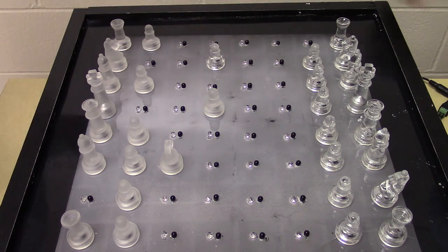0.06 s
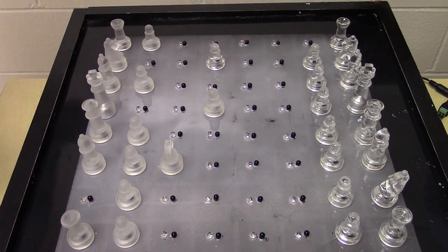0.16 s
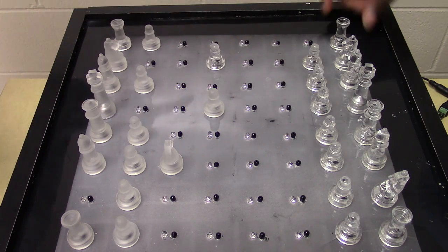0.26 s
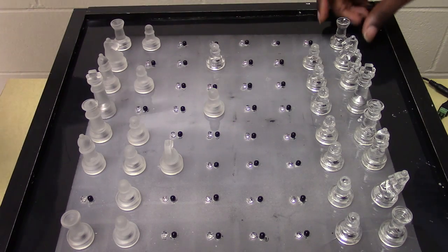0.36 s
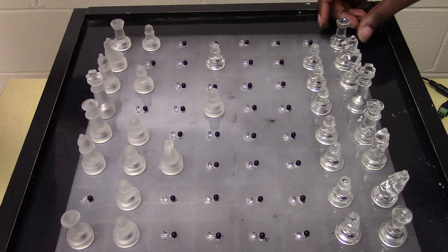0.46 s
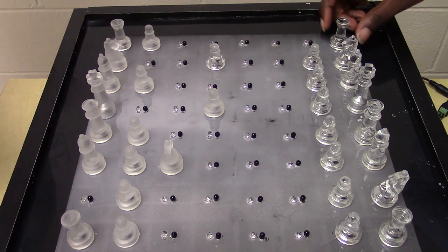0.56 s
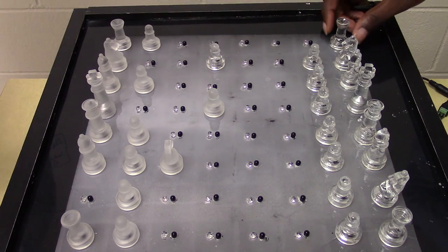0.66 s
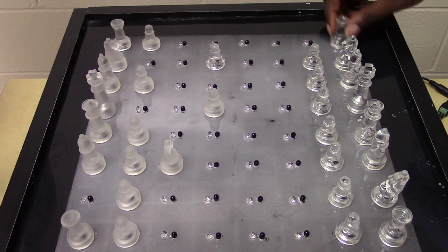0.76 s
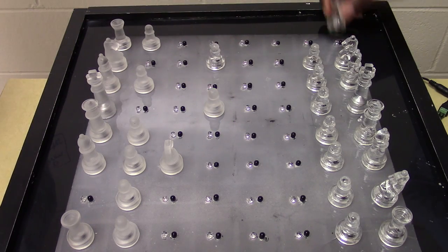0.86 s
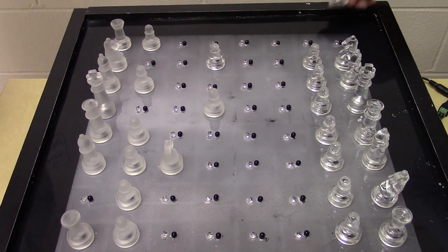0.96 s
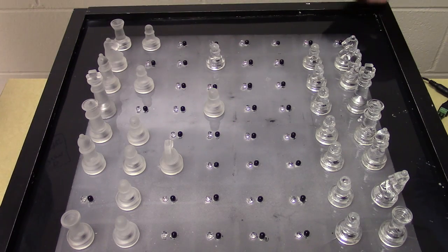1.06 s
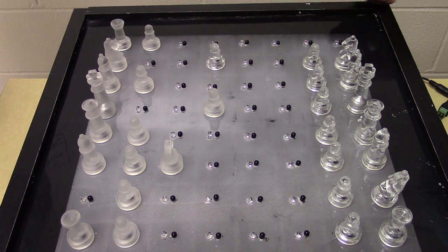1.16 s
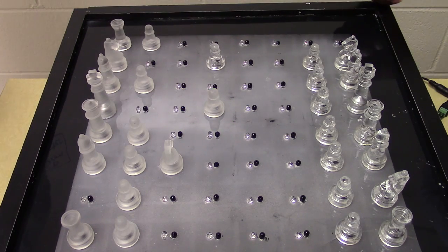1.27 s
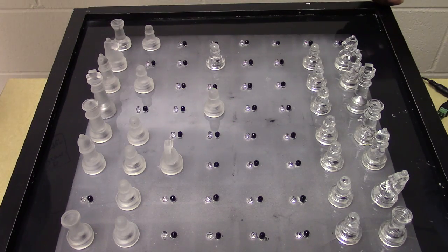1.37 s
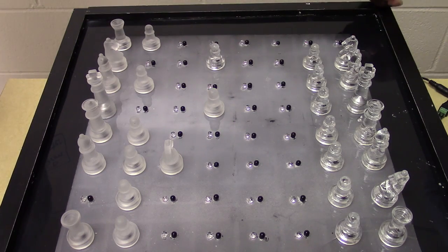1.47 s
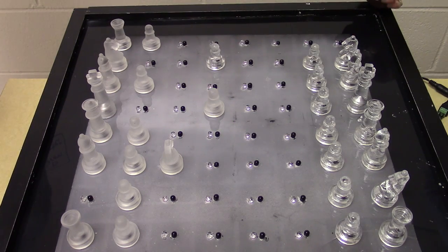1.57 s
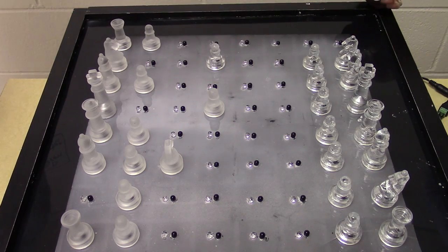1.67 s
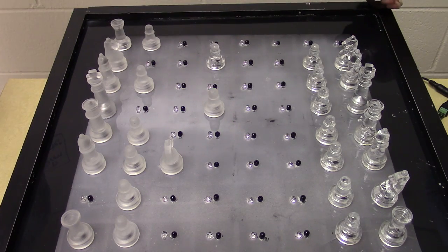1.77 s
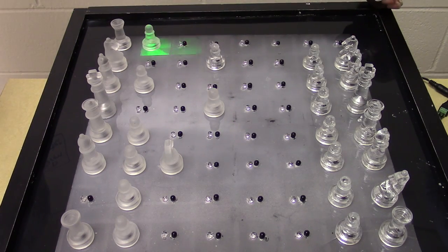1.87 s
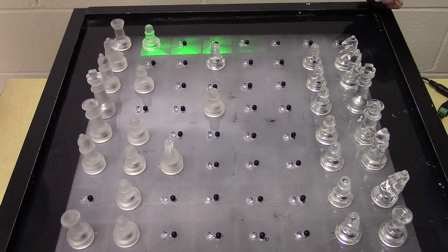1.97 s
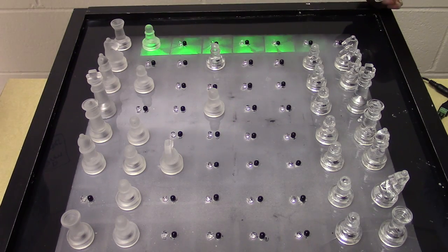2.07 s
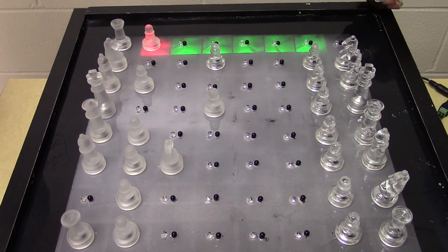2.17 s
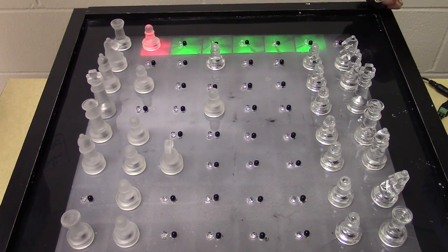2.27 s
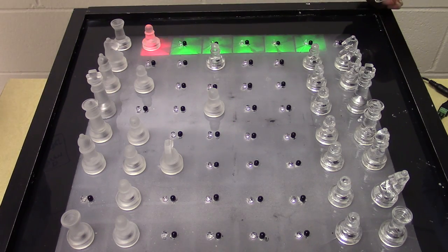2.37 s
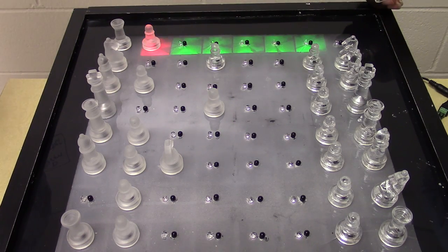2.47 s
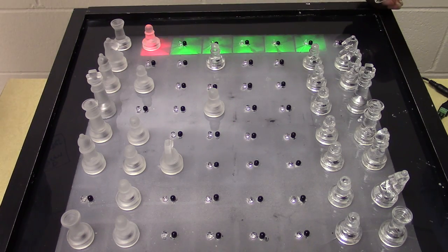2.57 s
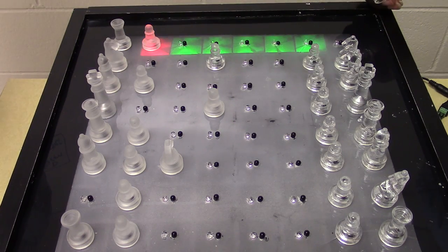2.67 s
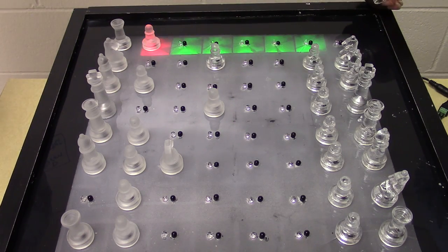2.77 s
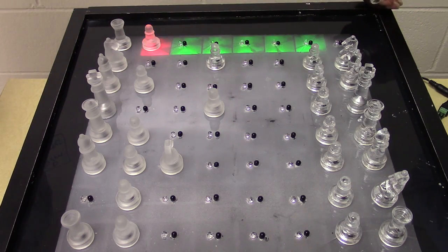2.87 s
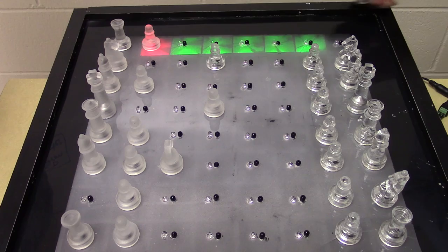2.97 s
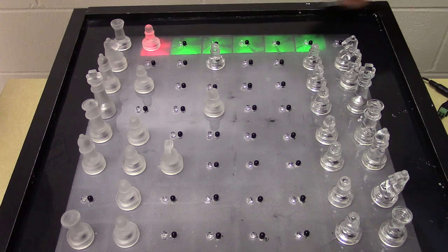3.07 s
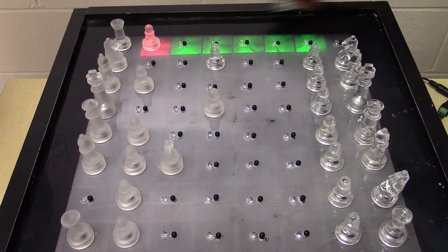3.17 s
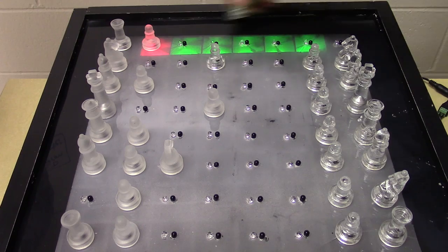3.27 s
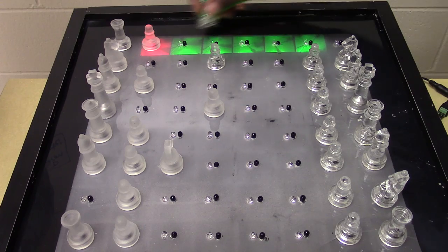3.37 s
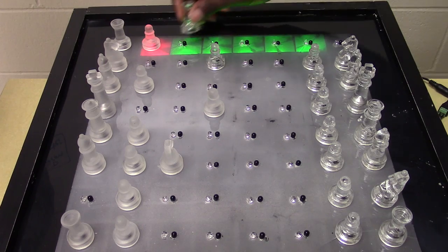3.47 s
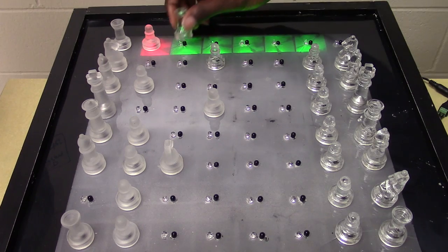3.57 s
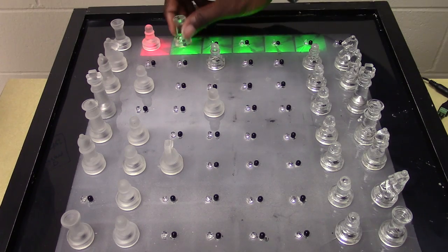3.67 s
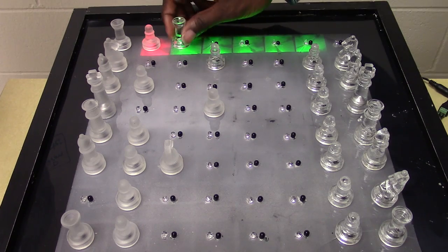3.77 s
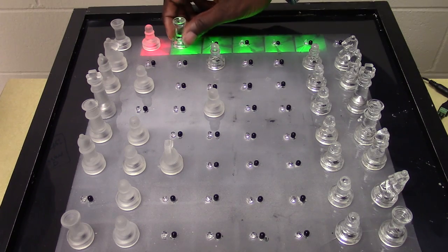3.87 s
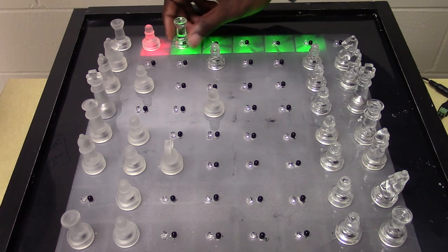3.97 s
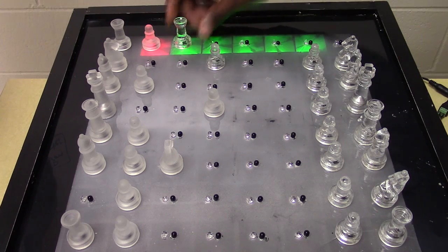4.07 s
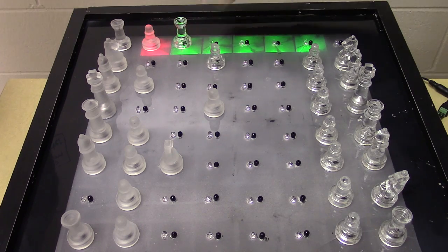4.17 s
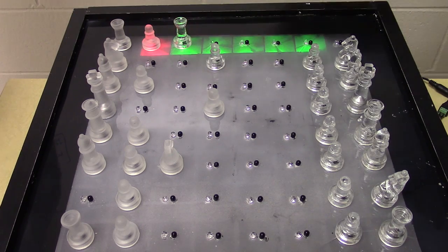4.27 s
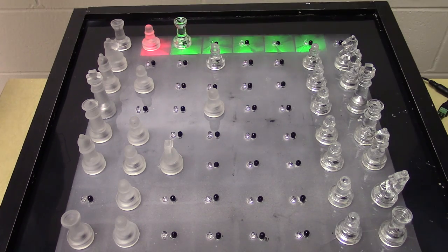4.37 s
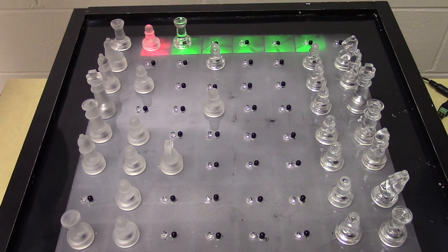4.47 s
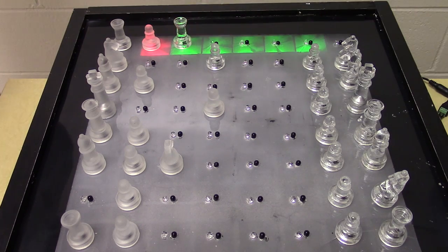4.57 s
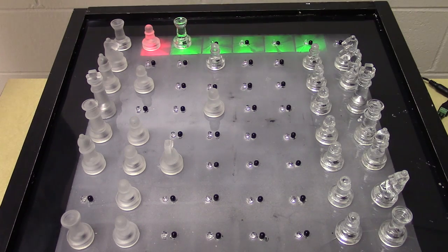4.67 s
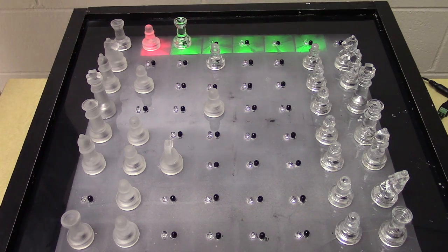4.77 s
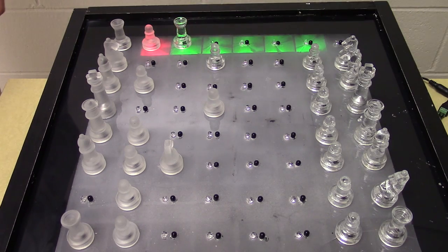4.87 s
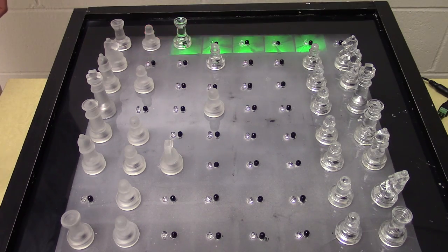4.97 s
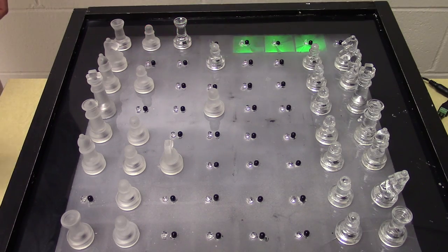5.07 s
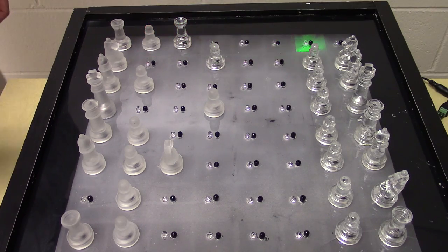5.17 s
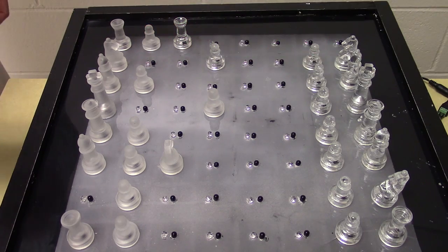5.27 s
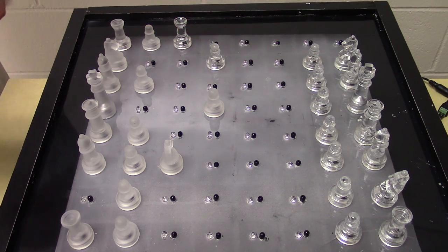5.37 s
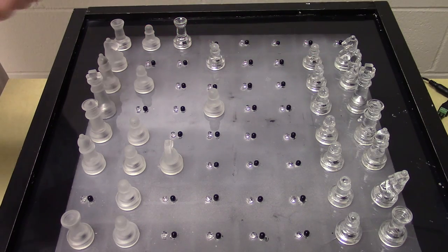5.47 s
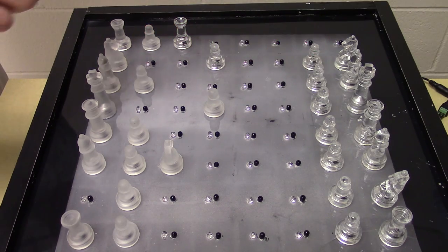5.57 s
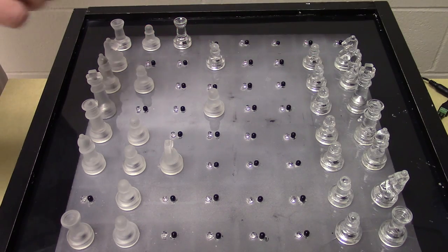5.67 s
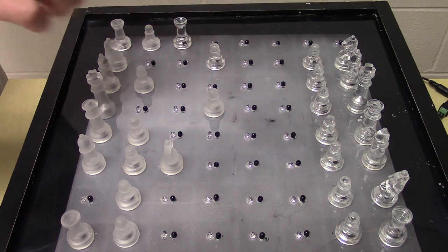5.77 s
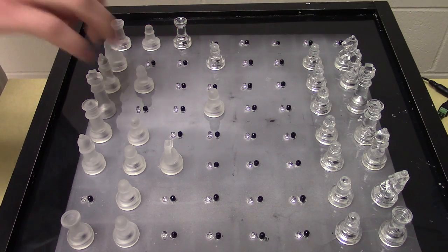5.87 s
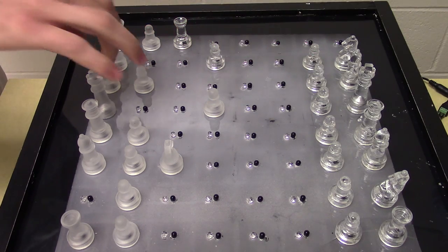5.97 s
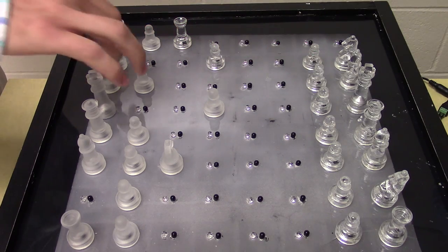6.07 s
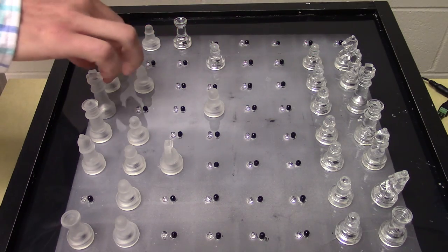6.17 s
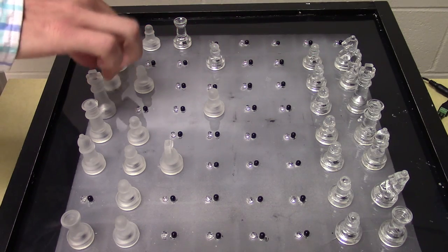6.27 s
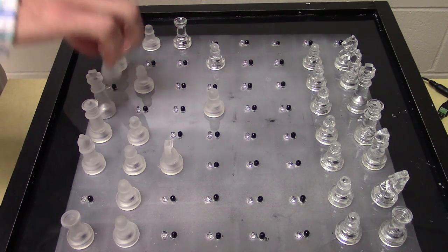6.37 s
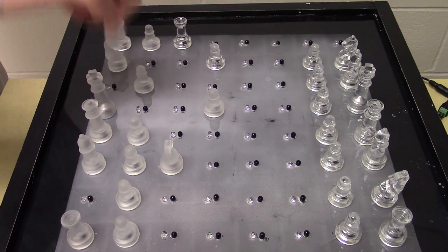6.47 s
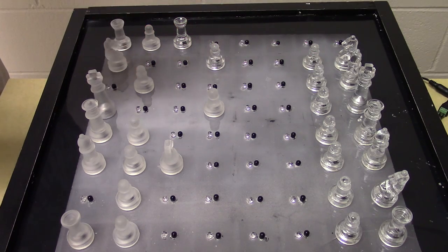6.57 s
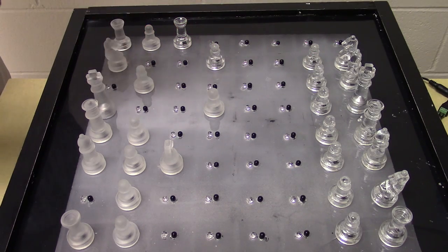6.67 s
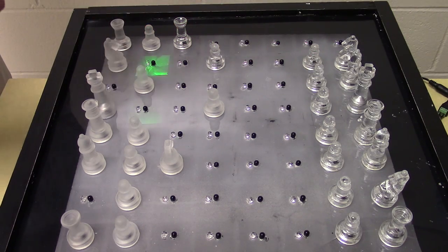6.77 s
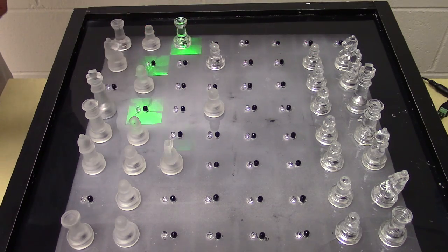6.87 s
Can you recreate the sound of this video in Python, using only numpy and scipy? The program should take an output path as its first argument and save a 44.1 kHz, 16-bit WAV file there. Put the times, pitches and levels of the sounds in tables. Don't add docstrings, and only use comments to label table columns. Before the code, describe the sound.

Quiet small hard-walled room with low ventilation rumble and faint mains hum. A glass piece knocks as it is lifted from a hollow board, sleeves rustle, then it lands with a loud, sharp, boxy clack and a small rebound. Light settling taps, cloth brushing and a brief chair creak follow, then another piece is nudged and rattles. Close camera microphone, with tiny lens motor buzzes.

```python
import sys
import numpy as np
from scipy import signal
from scipy.fft import rfft, irfft
from scipy.io import wavfile
from scipy.ndimage import uniform_filter1d

SR = 44100
rng = np.random.default_rng(int(sys.argv[2]) if len(sys.argv) > 2 else 0)


def master_out(mix):
    frames = np.transpose(np.atleast_2d(mix))
    ceiling = np.clip(frames, -1, 1)
    pcm = np.round(ceiling * 32767).astype(np.int16)
    wavfile.write(sys.argv[1], SR, pcm)


def voltage_ratio(level):
    return 10 ** (np.asarray(level, float) / 20)


N = 305172
HZ = np.fft.rfftfreq(N, 1 / SR) + 1e-3

# frequency in Hz, level in dB.
AIR_COLOUR = [(20, -46), (49, -19.5), (84, -36), (110, -2), (228, -7), (400, -10.5), (900, -22),
              (1500, -24.5), (2600, -27.5), (4500, -33), (8000, -38), (12000, -44), (14500, -48),
              (16000, -62)]
AIR_DB = -48
DRIFT_DB, STEADY_ABOVE_HZ = 0.8, 3000
# centre in Hz, width in Hz, lift in dB.
ROOM_MODES = [(118.6, 15, 2.5), (162.7, 29, 5.5), (226.5, 11, 12.5), (336.4, 31, 5.5), (435, 13, 4.5),
              (636, 25.4, 9), (1300, 7.2, 8.5)]
# frequency in Hz, side minus mid in dB.
AIR_WIDTH = [(25, -13), (60, -18), (110, -24), (200, -22.5), (380, -12), (700, -8), (1290, -6.5),
             (2380, -9), (4400, -10), (8120, -11.5), (15000, -11.5)]
# frequency in Hz, level in dB rms.
MAINS = [
    (59, -77),
    (120, -61),
]
# time in seconds, gain in dB.
HUM_SWELL = [
    (.8, 0),
    (1.15, 10),
    (2.1, 4),
    (2.9, 3),
    (3.4, -13),
    (4.4, 1.5),
]
# centre in Hz, 60 dB decay time in seconds, level in dB.
ROOM_TAIL = [(216, 0.57, -28.5), (480, 0.83, -33.5), (1080, 0.29, -29.5), (2120, 0.64, -30.5),
             (4500, 0.67, -49.5), (9000, 0.24, -25)]

# start in seconds, level in dB, length in ms.
LENS_TWITCHES = [(.33, -70, 22), (1.158, -58, 14), (1.268, -60, 22), (1.836, -64.5, 18), (1.937, -60.5, 18),
                 (3.931, -59.5, 17), (4.035, -61.5, 22), (4.138, -59.5, 15), (4.26, -62, 17.7),
                 (4.338, -62.5, 19), (6.758, -59, 21), (6.866, -62.5, 20)]
# centre in Hz, width in Hz, level in dB.
LENS_BODY = [(5000, 380, -2), (6300, 900, 2.5), (7800, 740, -2), (10800, 1800, -5)]

# start in seconds, hold in seconds, level in dB, body in dB, sheen in dB.
ARM_MOVES = [(0, 0.37, -69, 5.5, -15), (0.51, 0.38, -70, 5.5, -19), (0.982, 0.33, -69.5, 4.5, -25),
             (1.508, 0.34, -69, 6, -25), (2.768, 0.13, -65.5, 0, -8), (3.044, .05, -66.5, -5, 0),
             (3.198, .18, -64.5, 4, -3), (3.45, .15, -74, 0, -4), (4.104, 0.22, -70, 5.5, -13),
             (4.43, 0.3, -67, 8, -12), (4.821, 0.095, -60.5, 6.5, -9), (4.94, 0.2, -64, 4.5, -10),
             (5.196, 0.015, -59.5, 4.5, -20), (5.25, 0.1, -70, 7.5, -13), (6.85, .1, -74, 2, -12)]
BRUSH_ATTACK, BRUSH_RELEASE = 0.19, 0.31
BRUSH_ONSET_S, BRUSH_FADE_S = 0.012, 0.054
# start in seconds, hold in
# seconds, level in dB, start pitch in Hz, end pitch in Hz.
SQUEAKS = [
    (0.779, 0.036, -61.5, 2150, 2230),
    (1.024, 0.14, -73.5, 11400, 11800),
    (3.07, .03, -78, 11500, 11700),
    (3.172, 0.06, -65, 10500, 11000),
    (3.25, .03, -63, 10600, 10400),
    (3.293, .05, -61, 11200, 11400),
    (3.37, .04, -76, 10600, 10500),
    (4.84, .02, -60, 2980, 3430),
    (4.947, .015, -54, 879, 920),
    (5.245, .015, -62, 2260, 2280),
]
SQUEAK_ATTACK_S, SQUEAK_RELEASE_S = 0.015, 0.012

# start in seconds, peak in dB, centre in Hz.
TICKS = [
    (.338, -51.5, 5600),
    (.56, -55, 5000),
    (0.8268, -48, 2600),
    (1.513, -44, 6600),
    (3.031, -49, 6950),
    (4.1355, -47, 5760),
    (5.197, -40, 10200),
]

# start in seconds, peak in dB, treble in dB, push in ms.
CHAIR = [
    (5.2093, -31.5, -27, 0.25),
    (5.221, -39, -22, 0.4),
    (5.255, -41.5, -22, .4),
]
# centre in Hz, width in Hz, level in dB.
CHAIR_MODES = [(503, 150, 5), (696, 300, 0), (880, 110, -6), (1600, 200, -11), (2300, 200, -13),
               (3170, 250, -16)]
# start in seconds, peak in dB, treble in dB, push in ms.
LIFT_FAR = [
    (.8417, -20, -36, 0.39),
    (.8485, -40, -40, 0.41),
    (.8525, -34, -40, 0.41),
    (.937, -48, -38, 0.37),
    (.959, -58, -22, .4),
]
# centre in Hz, width in Hz, level in dB.
FAR_MODES = [(770, 110, 2), (920, 280, 0), (1220, 370, -17), (1900, 260, -13), (2470, 140, -7.5),
             (2960, 220, -9.5), (3340, 180, -13)]
# start in seconds, peak in dB, treble in dB, push in ms.
GRASP = [
    (6.2585, -19.5, -30.5, 0.37),
    (6.2645, -42, -22, .2),
    (6.271, -39, -30, .4),
]
# centre in Hz, width in Hz, level in dB.
GRASP_MODES = [(520, 100, 2), (880, 140, -7), (1310, 240, 2.5), (1780, 240, -6.5), (2800, 310, -15),
               (3750, 280, -11), (5600, 600, -22)]
# start in seconds, peak in dB, treble in dB, push in ms.
LIFT_NEAR = [(6.3319, -19.5, -31, 0.31), (6.3335, -28, -30, 0.55), (6.3405, -37, -38, 0.38),
             (6.3435, -41, -38, .35), (6.3537, -25.5, -31, 0.56), (6.3605, -33, -36, 0.65),
             (6.3635, -32, -30, 0.6), (6.366, -35, -30, 0.48), (6.3695, -33, -36, 0.51),
             (6.3725, -41, -36, 0.53), (6.377, -39, -34, 0.59)]
# centre in Hz, width in Hz, level in dB.
NEAR_MODES = [(1040, 240, 3), (1270, 290, -4), (1730, 430, -5), (2460, 480, -3), (2780, 290, -11),
              (4750, 700, -10)]
# start in seconds, peak in dB, treble in dB, push in ms.
SETTLE = [
    (3.945, -38.5, -22, 0.3),
    (4.058, -33, -32, 0.26),
    (5.511, -57, -18, 0.4),
]
# centre in Hz, width in Hz, level in dB.
SETTLE_MODES = [(730, 130, -1), (910, 120, 7), (1170, 180, -14), (2000, 450, -13), (2600, 300, -14)]
# start in seconds, peak in dB, treble in dB, push in ms.
REBOUND = [
    (3.8192, -13, -14.5, 0.21),
    (3.8235, -30, -28, .5),
    (3.829, -26, -28, 0.64),
]
# centre in Hz, width in Hz, level in dB.
REBOUND_MODES = [(490, 81, -22), (626, 47, -3), (875, 220, 1), (1100, 110, 2.5), (1360, 300, 0.5),
                 (1860, 140, -1.5), (3120, 210, -1.5), (3680, 180, -24), (5200, 220, -9), (5600, 250, -11),
                 (7900, 400, -19)]
# start in seconds, peak in dB, treble in dB, push in ms.
SET_DOWN = [
    (3.746, -2, -24, 0.22),
    (3.7478, -12, -12, 0.18),
    (3.7498, -16.5, -39, 0.27),
    (3.752, -16, -31, 1),
    (3.757, -22.5, -20, 0.29),
]
# centre in Hz, width in Hz, level in dB.
SET_MODES = [(617, 84, -9), (830, 210, -18), (1110, 310, 2), (1570, 190, -3.5), (1956, 67, -4.5),
             (2490, 630, -17.5), (3240, 340, -11), (4000, 860, -7.5), (5300, 630, -11.5), (6130, 450, -24),
             (8530, 700, 6.5), (9100, 700, -35), (10600, 1200, -19)]
# centre in Hz, width in Hz, level in dB.
BOX_MODES = [(135, 12, -4), (162, 2.7, 12.5), (187, 28, 1), (216.5, 15, 8), (237, 59, 5.5), (310, 42, -13),
             (482, 48, -6), (600, 15, -18), (730, 90, -13)]


def unit(x):
    return x / np.sqrt(np.mean(x ** 2) + 1e-30)


def on_log(table):
    hz, db = np.transpose(table)
    return np.interp(np.log(HZ), np.log(hz), db)


def hiss(hz, width_hz, size=N):
    b, a = signal.iirpeak(min(hz, 18000), hz / width_hz, SR)
    return unit(signal.lfilter(b, a, rng.standard_normal(size)))


def smooth_twice(x, size):
    return uniform_filter1d(uniform_filter1d(x, size), size)


def walk(rate):
    held = int(SR / rate)
    levels = np.repeat(rng.standard_normal(N // held + 1), held)
    return 1.66 * smooth_twice(levels, held)[:N]


def add(track, s, sound):
    i = int(s * SR)
    track[i:i + len(sound)] += sound[:N - i]


def highpass(x, hz):
    return signal.sosfilt(signal.butter(4, hz, "high", fs=SR, output="sos"), x)


def stroke(t, s, hold, attack, release):
    return np.exp(np.minimum((t - s) / attack, 0) - np.maximum((t - s - hold) / release, 0))


def air():
    lift = sum((voltage_ratio(db) ** 2 - 1) / (1 + (2 * (HZ - f) / w) ** 2) for f, w, db in ROOM_MODES)
    colour = voltage_ratio(on_log(AIR_COLOUR)) * np.sqrt(1 + lift)
    mid, side = rfft(rng.standard_normal((2, N))) * colour
    spectra = np.array([mid, side * voltage_ratio(on_log(AIR_WIDTH))])
    out = 0
    for hz in 30 * 2.0 ** np.arange(10):
        band = np.cos(np.pi / 2 * np.clip(np.log2(HZ / hz), -1, 1)) ** 2
        drift = voltage_ratio(DRIFT_DB / (1 + hz / STEADY_ABOVE_HZ) * walk(2.774))
        out = out + drift * irfft(spectra * band, N)
    out = out * voltage_ratio(AIR_DB) / np.sqrt(np.mean(out[0] ** 2))
    t = np.arange(N) / SR
    deep, harmonic = [np.sqrt(2) * voltage_ratio(db + walk(4.0)) * np.sin(2 * np.pi * f * t) for f, db in MAINS]
    swell = voltage_ratio(np.interp(t, *np.transpose(HUM_SWELL)))
    out[0] += deep * swell + harmonic
    return out


def room(x):
    t = np.arange(SR) / SR
    rise = np.clip((t - 0.006) / 0.017, 0, 1)
    wet = []
    for _ in range(2):
        tail = sum(voltage_ratio(db) * hiss(f, f, size=SR) * voltage_ratio(-60 * t / t60) for f, t60, db in ROOM_TAIL)
        wet.append(signal.fftconvolve(x, tail * rise / 30)[:N])
    return np.array(wet) * voltage_ratio(np.array([[0], [-12]]))


def lens():
    gate = np.zeros(N)
    for s, db, ms in LENS_TWITCHES:
        run = np.linspace(0, 1, int(ms * SR / 1000))
        add(gate, s, voltage_ratio(db) * (0.7 + 1.0 * run ** 6))
    gate = uniform_filter1d(gate, size=40)
    buzz = unit(sum(voltage_ratio(db) * hiss(f, w) for f, w, db in LENS_BODY))
    return gate * highpass(buzz, 3900)


def brushing(t):
    power = np.zeros((3, N))
    for s, hold, db, body_db, sheen_db in ARM_MOVES:
        attack = BRUSH_ONSET_S + BRUSH_ATTACK * hold
        release = BRUSH_FADE_S + BRUSH_RELEASE * hold
        levels = voltage_ratio(db + np.array([[0], [body_db], [sheen_db]]))
        power += (levels * stroke(t, s, hold, attack, release)) ** 2
    fibre, body, sheen = np.sqrt(power)
    cloth = fibre * (hiss(3040, 3000) + 0.22 * hiss(5500, 5000))
    cloth = cloth + body * hiss(670, 740) + sheen * hiss(10500, 6000)
    return voltage_ratio(0.92 * walk(60)) * cloth


def squeaks(t):
    out = np.zeros(N)
    wobble = np.array([smooth_twice(noise, 34) for noise in rng.standard_normal((2, N))])
    wobble = wobble / wobble.std()
    for s, hold, db, start_hz, end_hz in SQUEAKS:
        phase = 2 * np.pi * np.cumsum(np.interp(t, [s, s + hold], [start_hz, end_hz])) / SR
        tone = wobble[0] * np.cos(phase) + wobble[1] * np.sin(phase)
        out += voltage_ratio(db - 1.0) * stroke(t, s, hold, SQUEAK_ATTACK_S, SQUEAK_RELEASE_S) * tone
    return out


def sleeves():
    t = np.arange(N) / SR
    return brushing(t) + squeaks(t)


def ticks():
    track, t = np.zeros(N), np.arange(SR // 50) / SR
    for s, db, hz in TICKS:
        click = hiss(hz, 2300, size=len(t)) + 0.53 * hiss(3100, 6600, size=len(t))
        knock = voltage_ratio(-6) * np.sin(2 * np.pi * 1300 * t) * t / 0.00092
        add(track, s, voltage_ratio(db) * (click + knock) * np.exp(-t / 0.0018))
    return track


def ring(modes, seconds):
    t = np.arange(int(seconds * SR)) / SR
    out = sum(voltage_ratio(db) * w * np.exp(-np.pi * w * t) * np.sin(2 * np.pi * f * t) for f, w, db in modes)
    return out / np.abs(out).max()


def contacts(hits, modes, lowest_hz, box_db, scatter_db, crack_db):
    track, t = np.zeros(N), np.arange(SR // 20) / SR
    box = ring(BOX_MODES, 0.5)
    box = box * (1 - np.exp(-np.arange(len(box)) / SR / 0.00053))
    body = highpass(ring(modes, 0.5), lowest_hz) + voltage_ratio(box_db) * box
    crack_decay = np.exp(-t / 0.0012) + 0.063 * np.exp(-t / 0.0054)
    for s, db, treble_db, push_ms in hits:
        push = np.hanning(max(int(push_ms * SR / 1000), 1) + 2)
        knock = np.convolve(body, push)[:len(body)]
        knock /= np.abs(knock).max()
        sparse = rng.standard_normal(len(t)) * (rng.random(len(t)) < 0.1)
        echoes = voltage_ratio(scatter_db) * sparse * np.exp(-t / 0.0075) * (t > 0.002)
        echoes[0] = 1
        add(track, s, voltage_ratio(db) * signal.fftconvolve(knock, echoes))
        crack = hiss(7300, 9100, size=len(t)) * crack_decay
        add(track, s, voltage_ratio(db + treble_db + crack_db) * crack)
    return track


def board():
    hits = ticks() + contacts(CHAIR, CHAIR_MODES, 430, -34, -14.0, -6)
    hits += contacts(LIFT_FAR, FAR_MODES, 620, -36, -17.5, 2)
    hits += contacts(GRASP, GRASP_MODES, 580, -40, -17, 2.5)
    hits += contacts(LIFT_NEAR, NEAR_MODES, 870, -49, -17, -1)
    hits += contacts(SETTLE, SETTLE_MODES, 590, -30, -18, -2)
    hits += contacts(REBOUND, REBOUND_MODES, 400, -18, -20.5, -2)
    hits += contacts(SET_DOWN, SET_MODES, 533, -27.5, -17.0, 2.3)
    return signal.sosfilt(signal.butter(2, 11500, fs=SR, output="sos"), hits)


def scene():
    hits = board()
    near = highpass(hits, 120) + lens() + sleeves()
    mid, side = air() + highpass(room(hits), 90)
    side = side + voltage_ratio(-16.5) * np.gradient(near) + voltage_ratio(-37.0) * (mid + near)
    return np.array([mid + near + side, mid + near - side])


def low_pass(x):
    return signal.sosfilt(signal.butter(12, 16510, fs=SR, output="sos"), x)


def record(dry):
    top = signal.butter(12, 15300, fs=SR, output="sos")
    mix = signal.sosfilt(top, dry)
    return low_pass(mix)


dry = scene()
out = record(dry)
master_out(out)
```